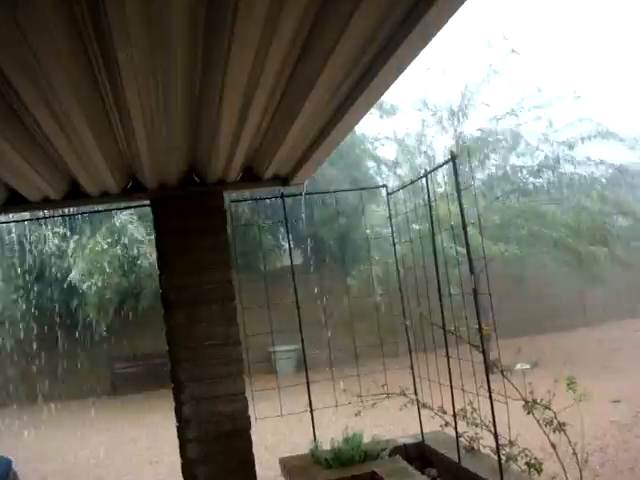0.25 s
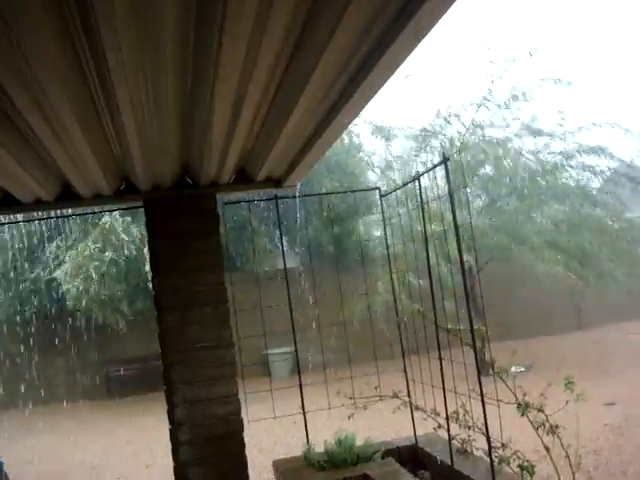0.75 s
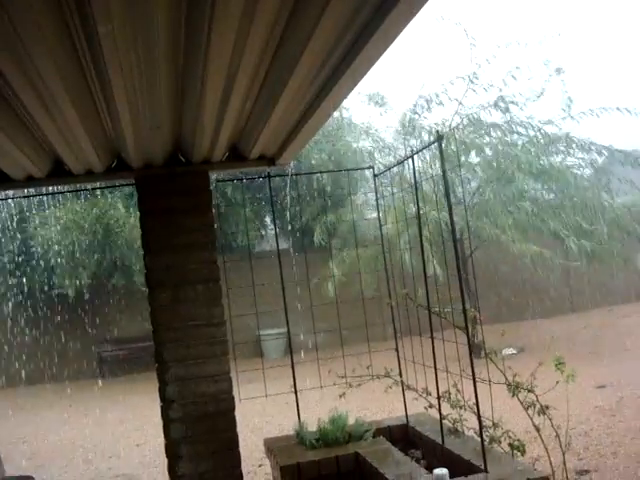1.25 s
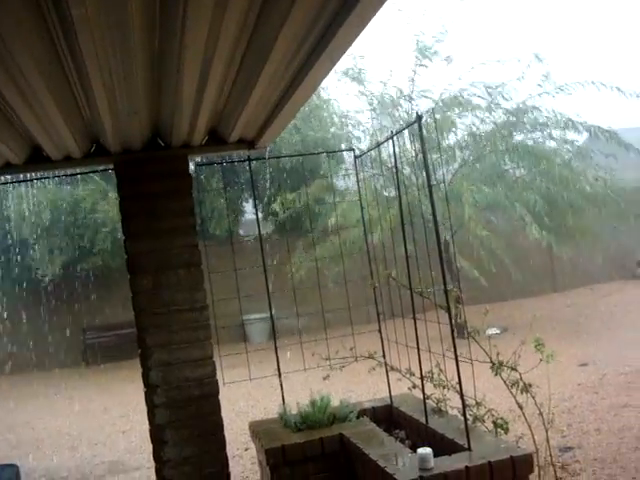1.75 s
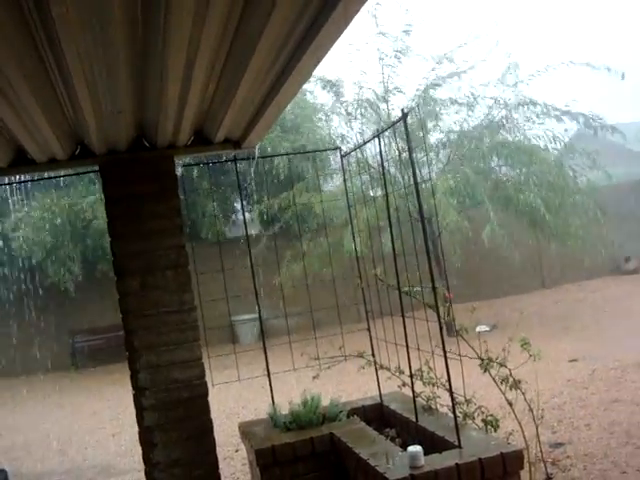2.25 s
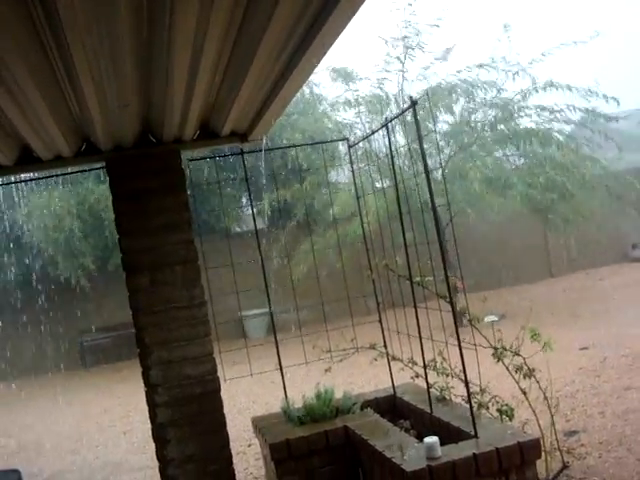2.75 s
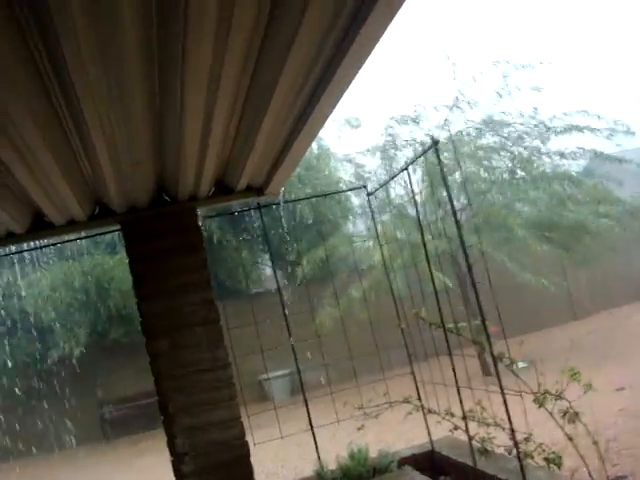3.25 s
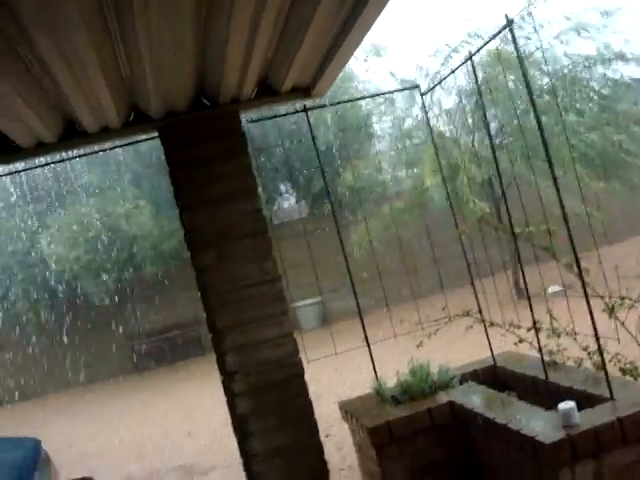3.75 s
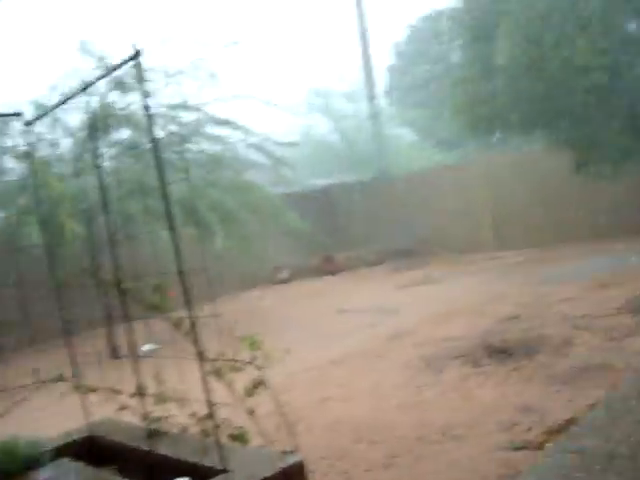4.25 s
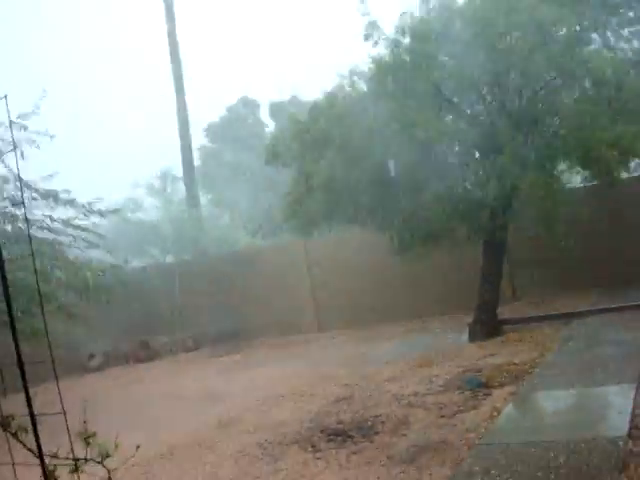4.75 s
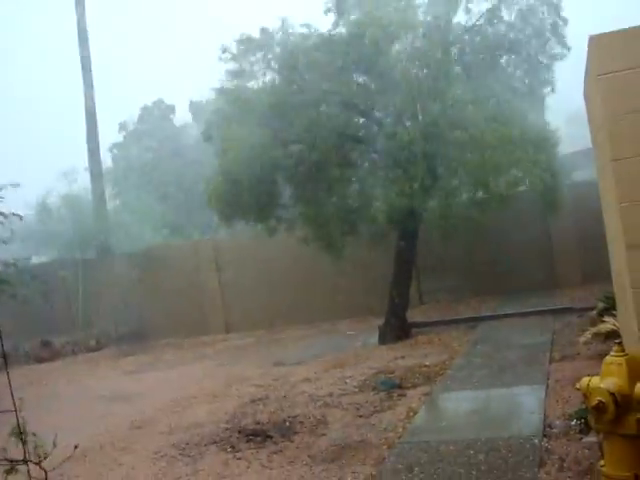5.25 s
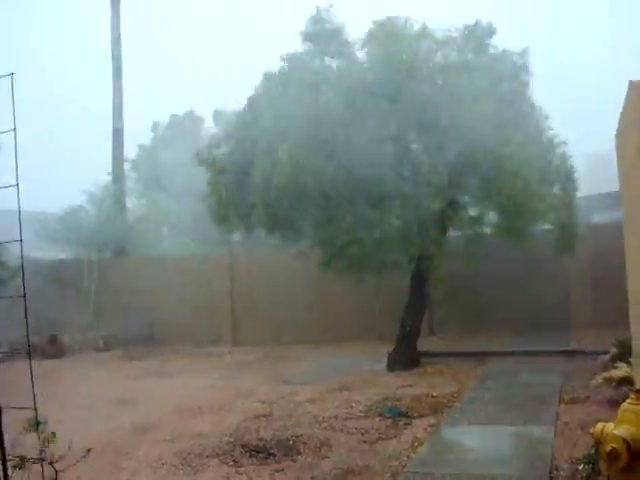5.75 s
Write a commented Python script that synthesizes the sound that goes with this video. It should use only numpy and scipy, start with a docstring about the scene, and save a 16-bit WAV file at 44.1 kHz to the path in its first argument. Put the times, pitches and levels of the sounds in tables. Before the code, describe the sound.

Heavy rain is in full force from the first moment to the end, about six seconds, heard in mono from beneath a corrugated metal patio roof. Thousands of drops merge into a dense midrange roar with slight grain and a broad, blurred sheet-metal ring. Around it lies a bright, wide hiss and fine crackle of rain and run-off on wet ground. Low wind roars unevenly in the trees. Small thumps near 0.1 s lead to a strong wind buffet at 0.5 s, when the rain drops away sharply and recovers. The roof surges around 1.8 s with another thump and dip. Wind strengthens near 3.3 s, with soft deep porch booms at about 3.35 and 3.7 s. Minor bumps follow at 4.3, 5.0 and 5.55 s, with boom swells from 4.75 to 5.3 s. Drumming dips near 5.2 s and ends weaker and brighter, the yard splash more prominent.

```python
"""Heavy rain drums on a corrugated metal patio roof, heard by one small microphone under the sheet.
Thousands of drops a second make the roof roar: random impacts and noise, with the broad rings of the sheet.
Run-off and rain crackle on the wet yard; wind roars in the trees and gusts boom in the porch, as shaped noise.
Wind buffets thump on the microphone port as suction pulses, and at each one the rain and roar duck and recover.
Air moving past the port adds a faint low flutter."""
import sys
import numpy as np
from scipy import signal
from scipy.fft import rfft, irfft, next_fast_len
from scipy.io import wavfile

SR = 44100
rng = np.random.default_rng(int(sys.argv[2]) if len(sys.argv) > 2 else 0)


def master_out(mix):
    """Clip the mix to full scale and print it as 16-bit PCM to the path in sys.argv[1]."""
    frames = np.transpose(np.atleast_2d(mix))
    ceiling = np.clip(frames, -1, 1)
    pcm = np.round(ceiling * 32767).astype(np.int16)
    wavfile.write(sys.argv[1], SR, pcm)


N = 264159  # samples, about 6 s

# Wind roar in the trees: (time [s], level [dB])
TREE_WIND = [(0.0, -36), (0.45, -38.5), (0.95, -37.5), (1.2, -39), (1.75, -32.5), (2.2, -36), (3.3, -31.5),
             (3.8, -34), (4.1, -32.5), (4.75, -36), (5.0, -38), (5.38, -34), (5.7, -43.5), (5.99, -36)]
# Gusts that make the porch boom: (time [s], swell [dB])
PORCH_GUSTS = [(3.18, 4), (3.35, 13.5), (3.67, 11), (4.15, 3), (4.75, 7), (5.0, 8), (5.28, 10)]
# The downpour: (time [s], roof drumming [dB], roof brightness [dB per octave], yard splash [dB])
DOWNPOUR = [(0.0, -18.5, 0.6, -21.5), (0.45, -19, -0.3, -21), (0.9, -19, 0.7, -21.5),
            (1.33, -17, -0.1, -22), (1.58, -19, -.6, -23), (1.78, -16, -1.1, -19.5),
            (2.1, -16.8, -0.6, -22), (2.55, -18, -0.7, -21.5), (2.85, -19, -0.8, -20),
            (3.28, -18.5, -0.8, -20.5), (3.62, -16.5, 0, -19), (3.85, -19.5, 0, -21),
            (4.1, -17.5, -0.1, -19), (4.75, -20, 0, -19.5), (5.0, -17.5, 0.5, -18.5),
            (5.2, -22.5, 0.5, -21), (5.36, -19, 0.3, -19.5), (5.99, -21, 1.1, -19)]
# Wind buffets on the port: (time [s], depth of the duck [dB], thump peak before the rebound filter [dB])
PORT_BUFFETS = [(.097, 4, -40), (.138, 4.5, -41), (0.495, 15, -31), (1.565, 1.5, -52), (1.715, 3.5, -52),
                (1.792, 9.5, -34), (1.879, 6, -39), (2.492, 4.5, -42), (3.165, 5, -48), (3.26, 2, -52),
                (3.785, 1.5, -56), (3.94, 0, -52), (4.32, 3, -41), (4.79, 0.5, -48), (4.92, 6, -50),
                (4.993, 5, -39), (5.55, 2, -42)]
# Relative spectrum of the wind in the trees: (frequency [Hz], density [dB per Hz])
TREE_SPECTRUM = [(70, -34), (130, -10.5), (200, -5), (320, 0), (500, -2.5), (650, -17), (1200, -72)]
# Relative spectrum of the porch boom: (frequency [Hz], density [dB per Hz])
BOOM_SPECTRUM = [(25, -15), (45, -8), (90, -3), (130, -2), (200, -13.5), (400, -62)]
# Relative spectrum of rain on the wet yard: (frequency [Hz], density [dB per Hz])
SPLASH_SPECTRUM = [(1300, -19.5), (2200, -6), (3500, -4.5), (4300, -5), (4900, -4), (6800, -4.5),
                   (8400, -5.5), (9400, -6.5), (11000, -14.5)]
# Relative spectrum of air moving past the port: (frequency [Hz], density [dB per Hz])
FLUTTER_SPECTRUM = [(4, 5.5), (12, 2), (30, -7), (60, -12), (120, -38)]
# Relative spectrum laid over the roof blows and rings: (frequency [Hz], density [dB per Hz])
ROOF_SPECTRUM = [(250, -34), (350, -14), (520, -7.5), (620, -3), (800, -1), (1000, -1.5), (1150, -2),
                 (1280, -2.5), (2000, -3.5), (2800, -7), (4300, -9), (4800, -21), (7000, -42)]
# Broad rings of the corrugated sheet: (frequency [Hz], width [Hz], lift before the roof spectrum [dB])
SHEET_RINGS = [(1632, 96, 2), (1730, 150, 2.5), (825, 85, 0)]

BOOM_BELOW_DB, GUST_S = 19, 0.027  # steady boom under the tree roar; half width of a swell
BRIEF_S, THUMP_S = 0.014, 0.006  # fade of the brief part of a duck; thump onset to peak, before the rebound
LINGER_SHARE = 0.43  # part of each duck that recovers slowly
RECOVERY_DB_PER_S = 21  # steady climb of that part, so deep ducks last longer
FLUTTER_DB = -55.5
CUTOFF_HZ = 10050  # top of the microphone's sound


def from_db(db):
    """Gain of a level in dB."""
    return 10 ** (np.asarray(db) / 20)


def rms_one(x):
    """Scales a sound to rms 1."""
    return x / np.sqrt(np.mean(x ** 2) + 1e-20)


def in_time(rows):
    """Columns of a table as curves over the samples."""
    s, *columns = np.transpose(rows)
    return [np.interp(np.arange(N) / SR, s, column) for column in columns]


def drift(rate_hz):
    """Slow chance of rms 1: noise at every 40th sample through a double one-pole low-pass."""
    r = np.exp(-80 * np.pi * rate_hz / SR)
    noise = rng.standard_normal(N // 40 + 2002)
    slow = signal.lfilter([1], [1, -2 * r, r * r], noise)[2000:]  # drop the settling
    return np.interp(np.arange(N) / 40, np.arange(len(slow)), rms_one(slow))


def coloured(x, spectrum, patch_db, patch_rate, step=0.473, tilt_db=0):
    """Gives x a spectrum; overlapping bands (step octaves apart) swell and sink each on their own."""
    size = next_fast_len(N)
    octave = np.log2(np.maximum(np.arange(size // 2 + 1) * SR / size, 1))
    hz, level_db = np.transpose(spectrum)
    shaped = rfft(x, size) * from_db(np.interp(octave, np.log2(hz), level_db))
    lowest = np.floor(np.log2(hz[0]) / step) * step
    out = np.zeros(N)
    for centre in np.arange(lowest, np.log2(hz[-1]) + step, step):
        window = np.cos(np.pi / 2 * np.clip((octave - centre) / step, -1, 1)) ** 2
        band = irfft(shaped * window, size)[:N]
        leaning_db = tilt_db * (centre - 10)  # turns about 1 kHz
        out += band * from_db(patch_db * drift(patch_rate) + leaning_db)
    return rms_one(out)


def drops(per_s, spread_db):
    """Impacts at random moments with random sign; a few drops are much fatter than the rest."""
    fatness_db = spread_db * np.minimum(rng.exponential(1, N), 4)
    sizes = from_db(fatness_db) * rng.standard_normal(N)
    falls = rng.random(N) < per_s / SR
    return rms_one(sizes * falls)


def lifted(x, hz, width_hz, lift_db):
    """Adds a two-pole resonance that stands lift_db out of its surroundings."""
    r = np.exp(-np.pi * width_hz / SR)
    poles = [1, -2 * r * np.cos(2 * np.pi * hz / SR), r * r]
    ring = signal.lfilter([(1 - r * r) / 2, 0, (r * r - 1) / 2], poles, x)
    return x + (from_db(lift_db) - 1) * ring


def tree_roar(level_db):
    """Turbulent wind in the trees: low noise whose wide bands swell separately."""
    noise = rng.standard_normal(N)
    return from_db(level_db) * coloured(noise, TREE_SPECTRUM, patch_db=2.2, patch_rate=8.8, step=0.915)


def porch_boom(roar_db):
    """Gusts make roof and porch boom softly: deep noise follows the roar and swells briefly at each gust."""
    t = np.arange(N) / SR
    level_db = roar_db - BOOM_BELOW_DB
    for s, swell_db in PORCH_GUSTS:
        level_db = level_db + swell_db * np.exp(-((t - s) / GUST_S) ** 2 / 2)
    noise = rng.standard_normal(N)
    return from_db(level_db) * coloured(noise, BOOM_SPECTRUM, patch_db=-0.5, patch_rate=12.0, step=0.91)


def yard_splash(level_db):
    """Run-off and rain burst on wet ground: fine crackle over a smooth far hiss."""
    bursts = drops(3000, spread_db=2.0) * from_db(-11) + rng.standard_normal(N)
    return from_db(level_db) * coloured(bursts, SPLASH_SPECTRUM, patch_db=1.03, patch_rate=32.0)


def port_flutter():
    """Air moving past the microphone port: faint noise, mostly at a few Hz."""
    noise = rng.standard_normal(N)
    return from_db(FLUTTER_DB) * coloured(noise, FLUTTER_SPECTRUM, patch_db=0.7, patch_rate=3.0, step=0.82)


def port_buffets():
    """Each buffet is a short suction pulse; the duck falls within a few ms and recovers in two stages."""
    duck_db, thumps = np.zeros(N), np.zeros(N)
    for s, depth_db, thump_db in PORT_BUFFETS:
        start = round(s * SR)
        age = np.arange(N - start) / SR
        fall = 1 - np.exp(-(age / 0.0015) ** 2)
        brief_db = (1 - LINGER_SHARE) * depth_db * np.exp(-(age / BRIEF_S) ** 2)
        linger_db = np.maximum(LINGER_SHARE * depth_db - RECOVERY_DB_PER_S * age, 0)
        duck_db[start:] += fall * (brief_db + linger_db)
        thumps[start:] -= from_db(thump_db) * age / THUMP_S * np.exp(1 - age / THUMP_S)
    rebound = signal.butter(1, 6.0, "high", fs=SR)  # the pressure leaks away and swings back
    return from_db(-duck_db), signal.lfilter(*rebound, thumps)


def roof(level_db, bright_db):
    """Drops drum on the ringing sheet; their blows overlap into a roar with a little grain left."""
    blows = drops(1500, spread_db=3.5) * from_db(-9.0) + rng.standard_normal(N)
    for ring in SHEET_RINGS:
        blows = lifted(blows, *ring)
    drumming = coloured(blows, ROOF_SPECTRUM, patch_db=0.1, patch_rate=18.0, tilt_db=bright_db)
    return from_db(level_db) * drumming


def scene():
    """Rain and wind share small surges and the ducks; both channels carry the one microphone."""
    roar_db, = in_time(TREE_WIND)
    roof_db, bright_db, splash_db = in_time(DOWNPOUR)
    storm = tree_roar(roar_db) + porch_boom(roar_db)
    rain = yard_splash(splash_db) + roof(roof_db, bright_db)
    surges = from_db(0.13 * drift(11.0) + 0.49 * drift(45.0))
    duck, thumps = port_buffets()
    sound = duck * surges * (storm + rain) + thumps + port_flutter()
    return np.array([sound, sound])


def record(dry):
    """The microphone rounds peaks slightly, then a steep low-pass cuts the top."""
    rounded = 0.9 * np.tanh(dry / 0.9)
    low_pass = signal.ellip(14, 0.3, 85, CUTOFF_HZ, fs=SR, output="sos")
    return signal.sosfilt(low_pass, rounded)


dry = scene()
out = record(dry)
master_out(out)
```